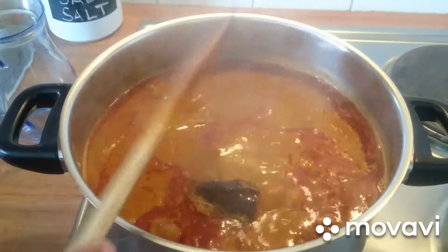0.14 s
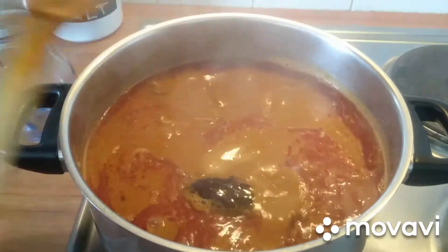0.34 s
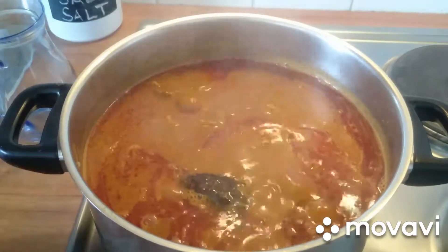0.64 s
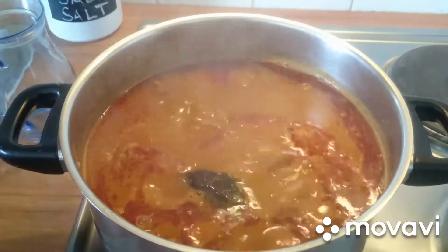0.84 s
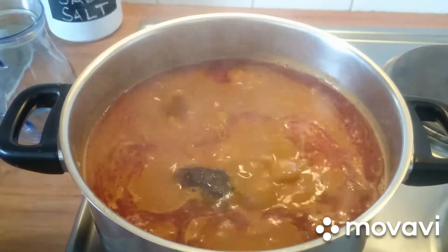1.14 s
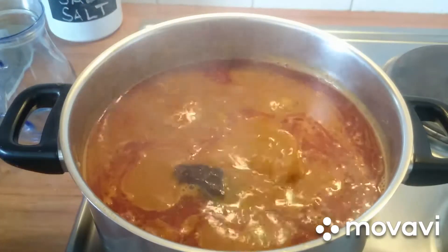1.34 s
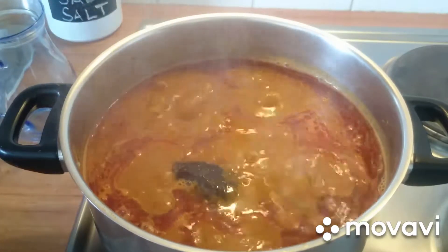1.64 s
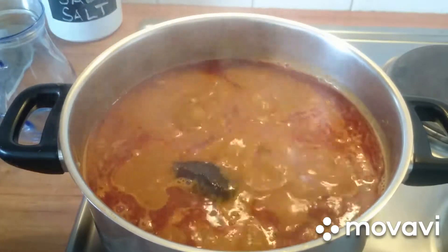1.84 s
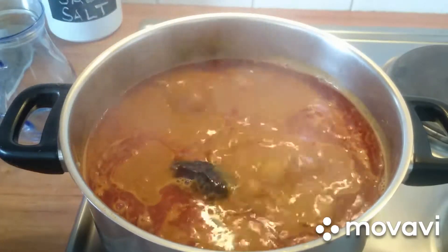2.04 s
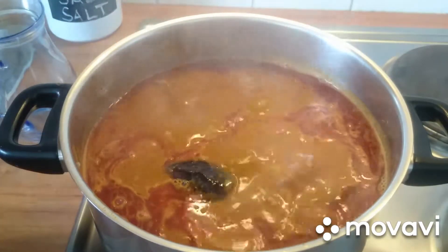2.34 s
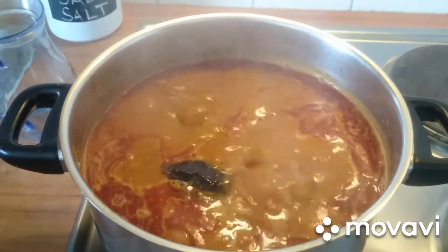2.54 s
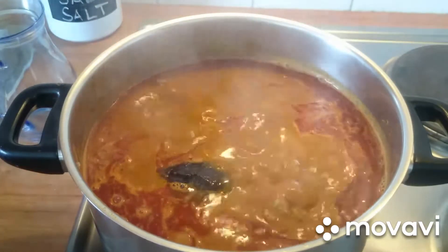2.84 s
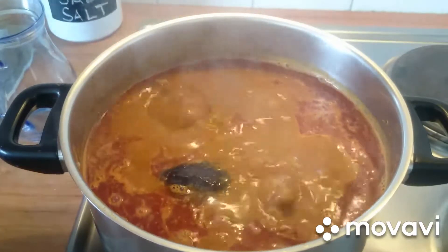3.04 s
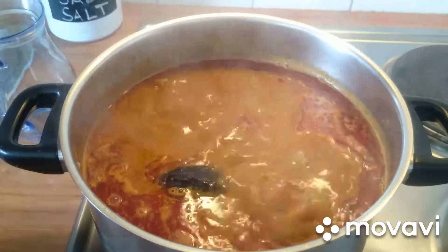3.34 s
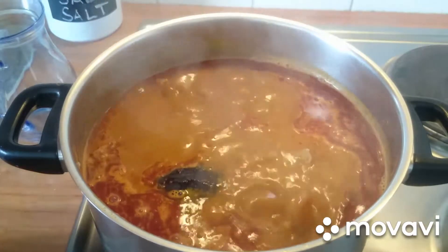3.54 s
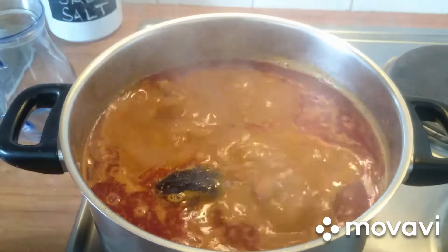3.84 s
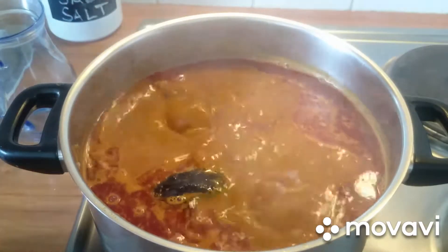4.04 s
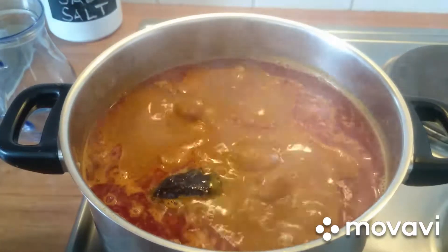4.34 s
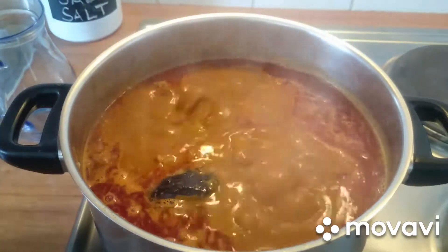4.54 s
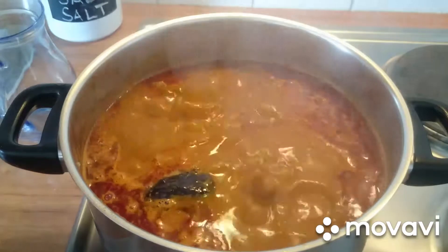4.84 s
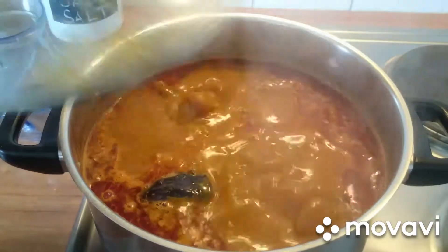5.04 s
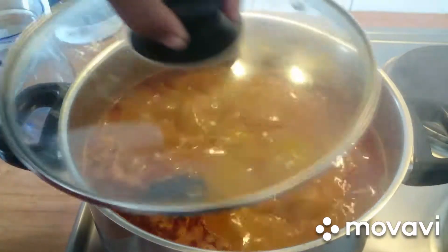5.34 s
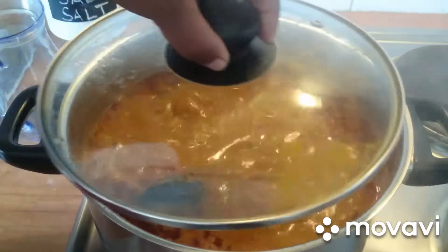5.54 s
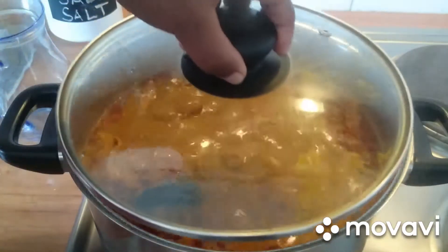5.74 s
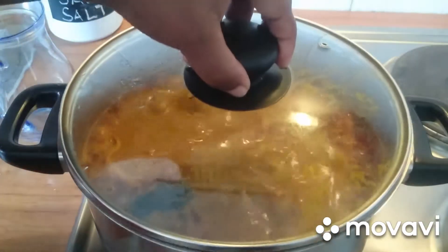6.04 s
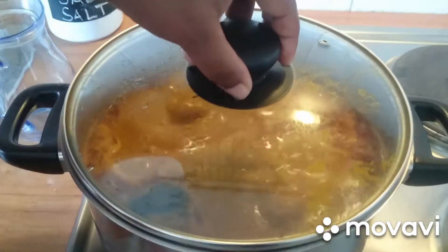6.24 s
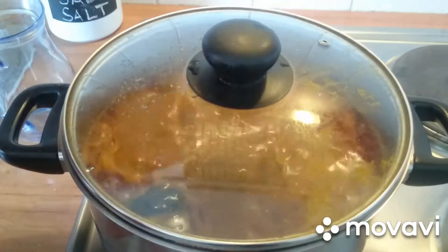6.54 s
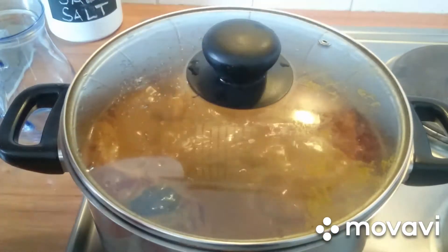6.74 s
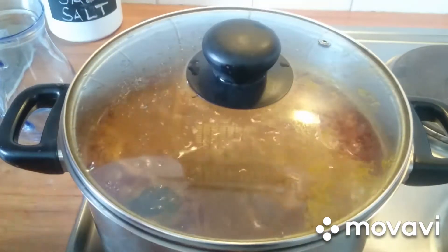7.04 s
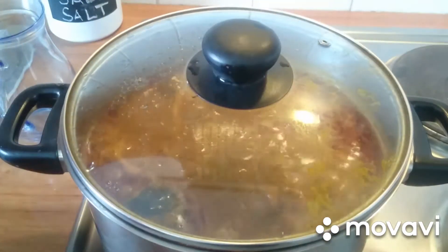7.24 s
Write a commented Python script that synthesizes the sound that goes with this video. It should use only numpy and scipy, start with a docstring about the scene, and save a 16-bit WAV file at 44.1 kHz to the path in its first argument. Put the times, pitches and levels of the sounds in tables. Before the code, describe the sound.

Throughout, a pot of thick soup simmers close to wide stereo microphones in a small kitchen: a thin soft fizz, a quiet low rumble, and many tiny, dry, high bubble pops at irregular intervals, often leaning left, some trailed by finer droplets. At 1.2 s a spoon makes a small clear clink on a dish. A faint rub at 3.7 s leads to a hard knock at 4.0 s and a much louder glass-and-worktop clatter at 4.1 s, with short ringing and a brief low boom; lighter glassy clinks follow at 4.25 and 4.4 s. Pops and faint dull taps continue while the lid is carried, and the rumble rises slightly from 5.5 s. Between 6.0 and 6.3 s the lid settles on the pot with modest clinks and low soft thuds, then a barely audible slide. Simmering continues, with a stronger pop at 7.1 s, to the end around 7.4 s.

```python
"""In a small kitchen a pot of thick soup simmers: a soft fizz, tiny surface bubbles popping, a low rumble.
A spoon is laid on a dish; a glass lid is dragged and knocked off the worktop, carried over and set on the pot.
Knocks are noise bursts exciting resonators, slides are swelling noise, bubbles are short sines sinking in pitch,
and rumble and fizz are flickering bands of noise.
Two close microphone ports with widened stereo hear it: the bass arrives in opposite phase."""
import sys
import numpy as np
from scipy import signal
from scipy.io import wavfile

SR = 44100
rng = np.random.default_rng(int(sys.argv[2]) if len(sys.argv) > 2 else 0)


def unload_wav(signal):
    """Save mono or channel-first audio to the path in sys.argv[1] as 16-bit WAV at rate SR, clipped to [-1, 1]."""
    wavfile.write(
        sys.argv[1],
        SR,
        np.round(np.clip(np.atleast_2d(signal).T, -1, 1) * 32767).astype(np.int16),
    )


N = 325445
PORT_HZ = 4440  # resonance of the microphone port

# Hard knocks. Each row: time in seconds, level in dB, thud, body and edge of the contact spectrum in dB,
# contact time in seconds, glass ring in dB, worktop ring in dB, boom level in dB.
KNOCK_EVENTS = [(1.2361, -31, -82, -27, -40, 0.0056, -22, -24, -78),
                (3.9977, -10, -36.5, -34.5, -29, 0.003, -6.5, -2.5, -48),
                (4.124, -2, -19, -21.5, -20.5, 0.01, 4, 15, -39),
                (4.1305, -7, -18, -18.5, -22.5, 0.0044, -9, -6, -61),
                (4.2492, -28.5, -31, -29, -5, 0.0073, 14.5, -10, -55),
                (4.3739, -32, -47.5, -14.5, -2.5, 0.00096, 18, 14.5, -56.5),
                (6.0159, -38, -18, -28, -11.5, 0.0036, 5, 0, -62),
                (6.0657, -30.5, 4, -13.5, -15.5, 0.0054, 7.5, 15, -51.5),
                (6.196, -44, -6, 2, -27, 0.0048, 5, 8, -53)]
# Resonances of the worktop. Each row: frequency in Hz, bandwidth in Hz, level in dB.
WORKTOP_MODES = [(178, 18, -8), (260, 23, -14), (521, 50, -9), (584, 11, -8.5), (668.4, 58, -3),
                 (1050, 41, -2.5), (1200, 40, -2.5), (1368, 79, -3), (1700, 70, -1.5)]


def knocks():
    """Impact excitation: a short rattle of contact sets the modes of glass and worktop ringing."""
    # Resonances of the glass lid. Each row: frequency in Hz, bandwidth in Hz, level in dB.
    lid_modes = [(2630, 53, 3), (2900, 94, -2), (2903, 50, 4), (3530, 110, -4), (3980, 80, -5.5),
                 (3990, 50, -1.5), (4200, 90, -20.5), (4770, 85, -0.5), (4900, 33, -5), (5160, 270, -0.5),
                 (5440, 34, -13.5), (5830, 250, -2), (7320, 130, -6.5), (8170, 150, -8.5)]
    out = np.zeros((2, N))
    rattle = reply([(20, 0.012), (20000, 0.0009)], early_s=0.008, tail_db=-6)
    blow = signal.unit_impulse(rattle.shape[1], 90)
    glass = resonate(rattle + blow * [[0.9], [0.6]], lid_modes)
    # the low-passed blow reaches the two ports in opposite phase
    opposed_bass = 5 * signal.lfilter([0.03], [1, -0.975], blow) * [[1], [-1]]
    worktop = resonate(0.44 * rattle + 0.48 * blow + opposed_bass, WORKTOP_MODES)
    for s, db, thud_db, body_db, edge_db, contact_s, glass_db, worktop_db, _ in KNOCK_EVENTS:
        spectrum = contact_spectrum(thud_db, body_db, edge_db)
        contact = reply(spectrum, max(contact_s, 0.001), tail_db=-11.0)
        ringing = from_db(glass_db) * glass + from_db(worktop_db) * worktop
        add(out, from_db(db + 15) * (contact + ringing), s - 0.001)
    return out


def dish_and_taps():
    """Modal synthesis: the spoon rings the dish; dull taps of hands and handles ring one mode each."""
    # Spoon on dish. Each row: time in seconds, level in dB.
    spoon_hits = [(1.2363, -45)]
    # Modes of the dish. Each row: frequency in Hz, level in dB, 60 dB decay time in seconds.
    dish_modes = [(1140, -19, 0.4), (1334, 1, 0.58), (1270, -38, 0.24), (1596, -16, 0.34),
                  (3070, -0.5, 0.32), (3490, -31, .3), (5350, -28, .2), (5432, -23, 0.27), (6020, -3, 0.12)]
    # Dull taps. Each row: time in seconds, level in dB, pitch in Hz.
    tap_events = [(1.069, -46, 112), (2.285, -57, 1386), (4.091, -34, 840), (4.892, -49, 632),
                  (5.175, -47, 640), (5.289, -55, 780), (5.611, -54, 1183), (6.005, -50, 354),
                  (6.084, -35, 122), (6.102, -46, 525), (6.2, -40.5, 121), (6.29, -37, 110.4),
                  (7.069, -55, 283), (7.107, -45.5, 268), (7.291, -48, 262)]
    # Damping of the taps. Each row: pitch in Hz, 60 dB decay time in seconds.
    tap_decay = [(115, 0.18), (270, 0.034), (600, .1), (900, 0.069), (1400, 0.1)]
    # Taps at the right port. Each row: pitch in Hz, signed share of the left amplitude.
    tap_right_share = [(115, -0.79), (300, -0.47), (1150, -0.59), (1400, .8)]
    out = np.zeros((2, N))
    for s, db in spoon_hits:
        add(out, struck(dish_modes, db, lag_s=0.00004) * [[1.2], [0.6]], s)
    for s, db, hz in tap_events:
        # a soft contact about one cycle long
        touch = np.hanning(round(SR / hz) + 2)[None] * 4 * hz / SR
        mode = (hz, 0, max(at_hz(tap_decay, hz), 0.01))
        tap = signal.fftconvolve(struck([mode], db, lag_s=0), touch, axes=1)
        add(out, tap * [[1], [at_hz(tap_right_share, hz)]], s)
    return in_room(out, wet_db=-16)


def slides():
    """Friction noise: grainy rubbing swells and fades, and hums in the modes of the worktop."""
    # Things sliding. Each row: start in seconds, length in seconds, level in dB,
    # body and edge of the contact spectrum in dB, worktop ring in dB.
    slide_events = [(3.684, 0.14, -59.5, -36, -22, 6.5), (5.486, .16, -68, -31, -10, 6),
                    (6.379, 0.25, -68.5, -22, -41, -6)]
    hum_spectrum = [(300, -12), (500, 0.5), (700, -11.5), (1200, -5), (16000, -7)]  # (Hz, dB)
    out = np.zeros((2, N))
    for s, length, db, body_db, edge_db, worktop_db in slide_events:
        size = round(length * SR)
        grain = from_db(2 * rng.standard_normal(size // 80 + 1)).repeat(80)[:size]
        stroke = np.hanning(size) ** 0.86 * grain
        hum = resonate(bands(size, hum_spectrum, lambda hz: stroke), WORKTOP_MODES)
        rub = bands(size, contact_spectrum(-19.5, body_db, edge_db), lambda hz: stroke)
        add(out, from_db(db) * (rub + from_db(worktop_db) * hum), s)
    return in_room(out, wet_db=-14.0)


def pops():
    """Bubble oscillation: each burst is a snap and a few cycles sinking in pitch, then spat droplets."""
    # Louder bursts. Each row: time in seconds, level in dB, pitch sunk to in Hz, left over right in dB,
    # droplets relative to the burst in dB.
    burst_events = [(0.0742, -42.5, 4920, 2, -12), (0.317, -42, 5100, 2, -12.5),
                    (0.571, -39.5, 4240, 16.5, -9), (.609, -38.5, 4820, 13.5, -20),
                    (.642, -45, 4940, 2.5, -8), (0.6818, -40.5, 4440, 14, -13),
                    (0.7686, -46.5, 4250, 14, -7.5), (0.828, -47, 4430, 10, -5), (.8994, -46, 5240, 0, -12),
                    (0.928, -42, 4830, 15, -13.5), (1.3104, -45, 4950, 10, -16),
                    (1.4265, -44, 5500, 8, -16), (1.447, -48, 5400, 7, -18), (1.4753, -46.5, 5450, 13, -19),
                    (1.5594, -48, 4800, 2, -15), (1.657, -47, 5090, 8, -20), (1.781, -45, 5060, 12, -15),
                    (1.8572, -45, 4560, 6, -13), (1.9338, -46, 5140, 18.5, -22),
                    (1.9517, -45, 6030, 2.5, -25), (2.05, -52, 4450, -7, -11),
                    (2.1035, -47.5, 4630, 11, -12), (2.219, -36, 4610, 9, -25), (2.2987, -48, 5600, 9, -20),
                    (2.3506, -37, 4470, -1.5, -19), (2.434, -44, 5400, 17, -20),
                    (2.4813, -44, 4800, 10, -17), (2.5063, -43, 4820, -19, -19),
                    (2.6179, -46, 4900, 1, -18), (2.693, -40, 5200, -16.5, -21), (2.822, -42, 4800, 3, -6),
                    (2.926, -46, 3640, 9, -21), (3.0992, -49, 5600, 11, -13), (3.2306, -43, 4460, 5, -15),
                    (3.362, -45.5, 5170, 13.5, -16), (3.4165, -43, 4080, -9, -20),
                    (3.484, -47.5, 4200, 10, -11), (3.5434, -40, 4680, 1.5, -13),
                    (3.5931, -37, 4840, 10, -20.5), (3.668, -42.5, 5260, 1, -18),
                    (3.7795, -40, 5000, 2, -13), (3.831, -46.5, 5600, 12, -18.5),
                    (3.8607, -49, 5330, -8, -16), (3.946, -49, 5330, 8, -15), (4.509, -38, 4620, 0, -22),
                    (4.6743, -47, 4900, 8, -20), (4.7402, -47.5, 5200, 19, -25),
                    (4.838, -40.5, 5170, 0, -13), (4.974, -39, 5120, 10, -15.5),
                    (5.1126, -48, 3800, 8, -11), (5.1397, -39, 5150, 18.5, -17),
                    (5.197, -45.5, 5170, 16, -13.5), (5.3136, -47.5, 3400, 7, -11),
                    (5.475, -41, 4620, -12.5, -16.5), (5.562, -41.5, 4730, -3, -16),
                    (5.7169, -46, 4830, -6, -16), (6.2702, -41.5, 4730, 14, -21),
                    (7.0627, -35, 4560, 8, -8), (7.2, -48.5, 4540, 8, -10), (7.345, -42, 5040, 8, -17)]
    bubbles = [burst[:-1] for burst in burst_events] + droplets(burst_events) + list(small_bubbles())
    snap_db, snap_follows = -49, 0.49  # the snap grows by this share of the bubble's dB
    cycles, snaps, t = np.zeros((2, N)), np.zeros((2, N)), np.arange(220) / SR
    late = np.clip(t - np.array([[0], [0.00026]]), 0, None)  # the right port hears it a little later
    grow = late / 0.00085
    swell = (grow * np.exp(1 - grow)) ** 3
    snap = rng.standard_normal(t.shape) * (late > 0) * np.exp(-late / 0.00009)
    for s, db, hz, pan_db in bubbles:
        turns = hz * late * (1 + 0.38 * np.exp(-late / 0.0014))
        sides = from_db(np.array([[pan_db], [-pan_db]]) / 2)
        add(cycles, from_db(db) * sides * swell * np.sin(2 * np.pi * turns), s - 0.0006)
        add(snaps, from_db(snap_db + snap_follows * db) * sides * snap, s - 0.0006)
    band = signal.butter(1, [3000, 6500], "band", fs=SR, output="sos")
    cycles = signal.sosfilt(band, cycles + 1e-18)
    return in_room(cycles + signal.lfilter([1, -0.8], 1, snaps), wet_db=-9.5)


def droplets(bursts):
    """Poisson process: droplets follow each burst after random waits, weaker the later they come."""
    mean_wait_s, loss_db_per_s = 0.022, 108.5
    waits = mean_wait_s * rng.exponential(1, (len(bursts), 14))
    tunes = PORT_HZ * from_db(1.32 * rng.standard_normal((len(bursts), 14)))
    drops = []
    for (s, db, _, pan_db, spit_db), burst_waits, pitches in zip(bursts, waits, tunes):
        for wait, hz in zip(burst_waits, pitches):
            if s + wait < N / SR:
                drops.append((s + wait, db + spit_db - loss_db_per_s * wait, hz, pan_db))
    return drops


def small_bubbles():
    """Random arrivals: fainter bubbles at chance times, levels, pitches and sides."""
    count, floor_db, spread_db, middle_hz = 280, -64, 4.5, 5100
    times = rng.uniform(0, N / SR - 0.02, count)
    levels = floor_db + spread_db * np.minimum(rng.exponential(1, count), 3.5)
    pitches = middle_hz * from_db(1.5 * rng.standard_normal(count))
    pans = 3 + 4 * rng.standard_normal(count)
    return np.column_stack([times, levels, pitches, pans])


def simmer():
    """Band-wise modulated noise: rumble of pot and room, and the fizz of countless fine bubbles."""
    # Spectrum of the rumble. Each row: frequency in Hz, relative density in dB per Hz.
    rumble_spectrum = [(30, -20.5), (50, 1), (80, 1), (130, -4), (200, -9), (350, -10), (640, -10),
                       (1100, -18), (1600, -25.5), (16000, -76.5)]
    # Spectrum of the fizz. Each row: frequency in Hz, relative density in dB per Hz.
    fizz_spectrum = [(240, -47), (400, -16), (1030, -6.5), (1580, -3.5), (3420, -2.5), (4880, -1),
                     (6950, -7.5), (8240, -12.5), (9760, -15.5), (11400, -6.5), (15000, -30), (16000, -33)]
    # Course of the fizz. Each row: time in seconds, level in dB.
    fizz_course = [(0, -65.5), (3.9, -65), (5.2, -63.5), (5.9, -66), (6.5, -64), (6.9, -66), (7.38, -64.5)]
    t, together = np.arange(N) / SR, drift(4.5)
    rumble = bands(N, rumble_spectrum, lambda hz: from_db(2.0 * drift(2.0)))
    fizz = bands(N, fizz_spectrum, lambda hz: from_db(0.57 * together + 0.87 * drift(43)))
    # the rumble is louder from 5.5 s on, shortly before the lid is set on the pot
    steady = from_db(np.where(t < 5.5, -76, -72.5))
    fizz_level = from_db(np.interp(t, *np.transpose(fizz_course)))
    return np.hypot(steady, booms()) * rumble + fizz_level * fizz


def booms():
    """Two-stage decay: after a knock the cupboards boom, swelling and falling fast, then hum on."""
    rise_s, t60_s, tail_db, tail_t60_s = 0.039, 0.39, -22, 3.1
    events = np.array(KNOCK_EVENTS)
    since = np.clip(np.arange(N // 40 + 1) * 40 / SR - events[:, :1], 0, None)
    fall = from_db(-60 * since / t60_s) + from_db(tail_db - 60 * since / tail_t60_s)
    each = from_db(events[:, -1:]) * np.minimum(since / rise_s, 1) ** 2 * fall
    total = np.sqrt((each ** 2).sum(axis=0))  # powers add
    return np.interp(np.arange(N) / 40, np.arange(each.shape[1]), total)


def in_room(dry, wet_db):
    """Superposition: stereo direct sound plus its echoes by convolution."""
    echoes = reply([(20, 0.034), (20000, 0.0044)], early_s=0.0046, tail_db=-15.0)
    feed = 0.99 * dry + 0.95 * dry[::-1]
    return dry + from_db(wet_db) * signal.fftconvolve(feed, echoes, axes=1)[:, :dry.shape[1]]


def reply(spectrum, early_s, tail_db):
    """Impulse response: near bounces, then the room dying band by band; mid energy 1."""
    # Reverberation. Each row: frequency in Hz, 60 dB decay time in seconds.
    room_decay = [(60, 0.25), (160, 0.38), (420, 0.34), (1100, 0.34), (2900, 0.3), (7700, 0.31),
                  (15000, 0.33)]
    t = np.arange(2 * SR // 5) / SR
    # bounces arrive singly, so the level is uneven
    uneven = from_db(2.1 * rng.standard_normal(len(t) // 64 + 1)).repeat(64)[:len(t)]
    onset = 1 - np.exp(-t / 0.0026)

    def shape(hz):
        tail = from_db(tail_db - 60 * t / at_hz(room_decay, hz))
        return uneven * onset * (np.exp(-t / early_s) + tail)

    return bands(len(t), spectrum, shape) / np.sqrt(len(t))


def contact_spectrum(thud_db, body_db, edge_db):
    """Resonant emphasis: spectrum of a contact in (Hz, dB), with a point at the microphone port."""
    return [(25, thud_db - 2), (130, thud_db - 16.0), (350, (thud_db + body_db) / 2 + 0.5),
            (700, body_db + 9.5), (2200, body_db / 2 + 2.0), (PORT_HZ, 0),
            (7500, edge_db - 5.5), (16000, edge_db - 2.5)]


def bands(size, spectrum, shape):
    """Subband synthesis: half-octave stereo noise, each band shaped in time by shape(Hz); mid rms 1."""
    # Stereo width. Each row: frequency in Hz, side over mid in dB.
    side_over_mid = [(60, 16), (110, 13.5), (200, 9), (380, 7.5), (700, 5.5), (1290, -1), (2380, 1),
                     (4400, 0.5), (8120, -0.5), (15000, 1)]
    # Stereo balance. Each row: frequency in Hz, left over right in dB.
    left_over_right = [(60, 3.5), (110, -1.5), (200, 3), (380, -1), (700, 0), (1290, -0.5), (2380, -0.5),
                       (4400, 1), (8120, -1.5), (15000, 0)]
    out, edges = 0, 22 * 2 ** np.arange(0, 9.9, 0.5)
    white = rng.standard_normal((2, 2, size))  # neighbouring bands get unrelated noise
    for k, (low, high) in enumerate(zip(edges, edges[1:])):
        hz = np.sqrt(low * high)
        band_db = at_hz(spectrum, hz)
        if band_db < -38:  # too faint to matter
            continue
        band = signal.butter(2, [low, high], "band", fs=SR, output="sos")
        mid, side = signal.sosfilt(band, white[k % 2] * shape(hz))
        side = side * from_db(at_hz(side_over_mid, hz))
        lean = from_db(at_hz(left_over_right, hz) / 2)
        out = out + from_db(band_db) * np.array([(mid + side) * lean, (mid - side) / lean])
    return out / np.sqrt(np.mean(out.mean(0) ** 2))


def resonate(x, peaks):
    """Modal filtering: parallel resonances, signs alternating."""
    out = 0
    for k, (hz, width_hz, db) in enumerate(peaks):
        r = np.exp(-np.pi * width_hz / SR)
        poles = [1, -2 * r * np.cos(2 * np.pi * hz / SR), r * r]
        out = out + (-1) ** k * from_db(db) * signal.lfilter([1 - r, 0, r - 1], poles, x)
    return out


def struck(modes, level_db, lag_s):
    """Modal superposition: one blow rings a set of clear modes, the right port lagging by lag_s."""
    click = np.zeros((2, SR // 2))
    click[[0, 1], [0, round(lag_s * SR)]] = 1
    return sum(from_db(level_db + db) * ring(click, hz, t60) for hz, db, t60 in modes)


def ring(clicks, hz, t60):
    """Damped oscillator: a unit click starts a decaying sine of initial height 1."""
    r, w = from_db(-60 / (t60 * SR)), 2 * np.pi * hz / SR
    return signal.lfilter([0, np.sin(w)], [1, -2 * r * np.cos(w), r * r], clicks + 1e-18)


def drift(rate):
    """Low-passed noise: a slow random course of rms 1, about rate changes a second."""
    r = np.exp(-80 * np.pi * rate / SR)  # one step every 40 samples
    noise = rng.standard_normal(N // 40 + 2002)
    slow = signal.lfilter([1], [1, -2 * r, r * r], noise)[2000:]
    return np.interp(np.arange(N) / 40, np.arange(len(slow)), rms_one(slow))


def add(track, sound, s):
    """Linear superposition: mix a stereo sound in from time s."""
    i = round(s * SR)
    track[:, i:i + sound.shape[1]] += sound[:, :N - i]


def at_hz(points, hz):
    """Logarithmic frequency scale: interpolate a table of (Hz, value)."""
    points = np.array(points)
    return np.interp(np.log(hz), np.log(points[:, 0]), points[:, 1])


def from_db(db):
    """Decibel law: level to amplitude ratio."""
    return 10 ** (np.asarray(db) / 20)


def rms_one(x):
    """Power normalisation: scale to rms 1."""
    return x / np.sqrt(np.mean(x ** 2) + 1e-20)


def scene():
    """Superposition of all sources."""
    return knocks() + dish_and_taps() + slides() + pops() + simmer()


def record(dry):
    """Band limiting and saturation: deep bass and top are cut, the loudest peaks rounded."""
    bass_cut = signal.butter(3, 67.6, "high", fs=SR, output="sos")
    top_cut = signal.cheby2(12, 60, 16500, fs=SR, output="sos")
    dry = signal.sosfilt(bass_cut, dry)
    rounded = 0.9 * np.tanh(dry / 0.9)
    return signal.sosfilt(top_cut, rounded)


dry = scene()
out = record(dry)
unload_wav(out)
```